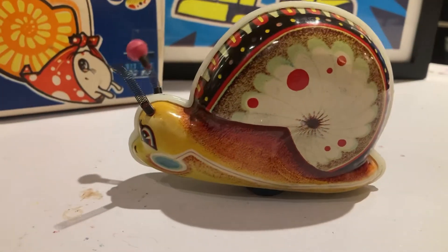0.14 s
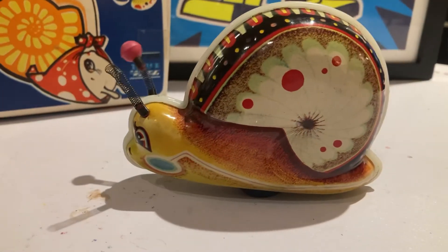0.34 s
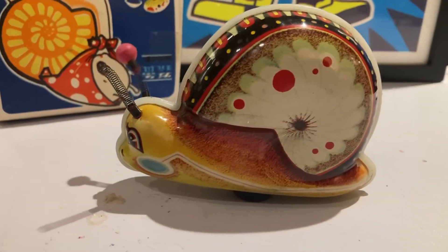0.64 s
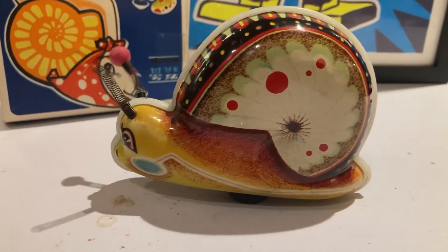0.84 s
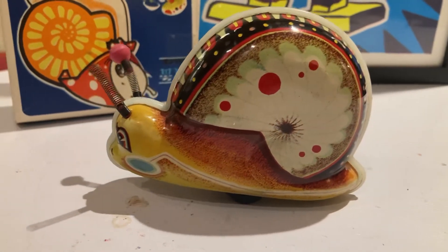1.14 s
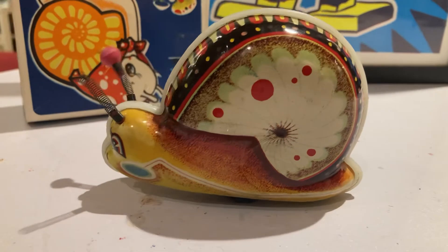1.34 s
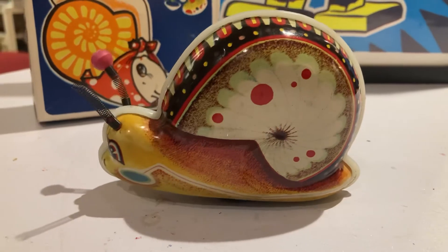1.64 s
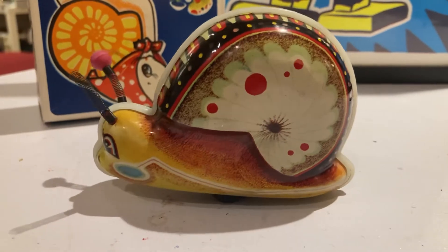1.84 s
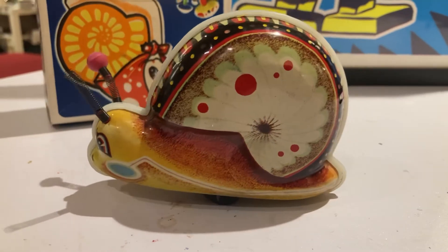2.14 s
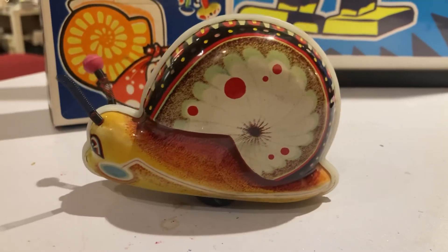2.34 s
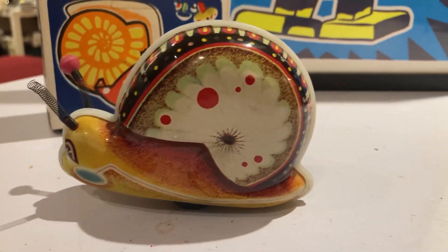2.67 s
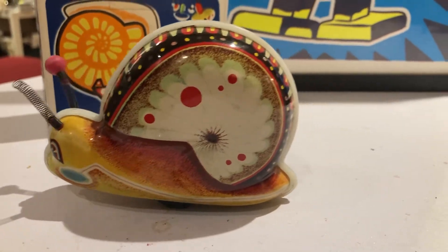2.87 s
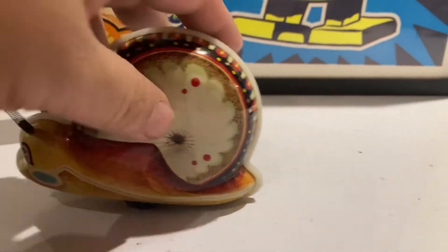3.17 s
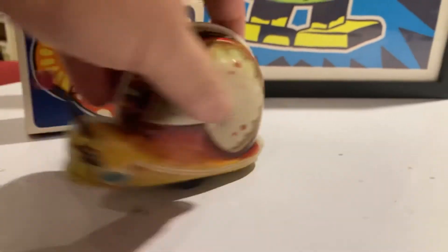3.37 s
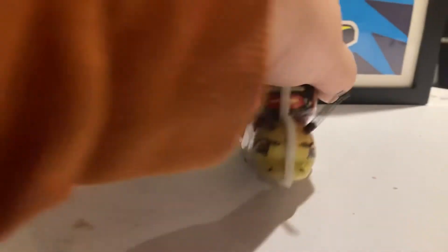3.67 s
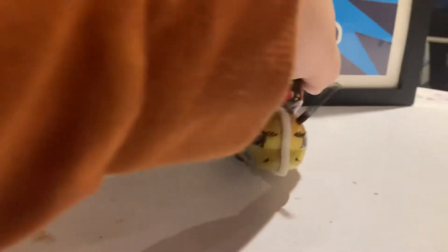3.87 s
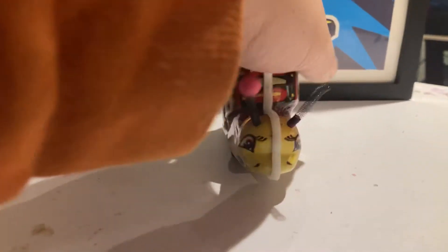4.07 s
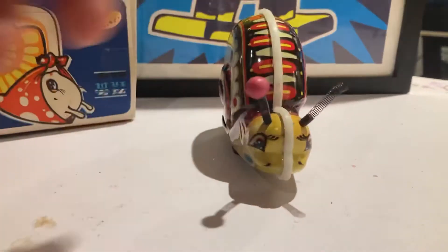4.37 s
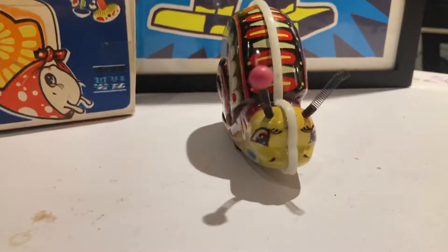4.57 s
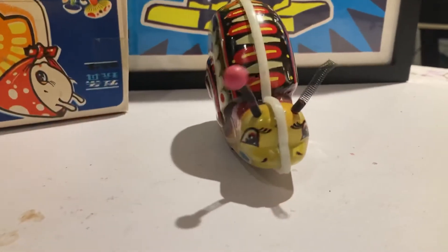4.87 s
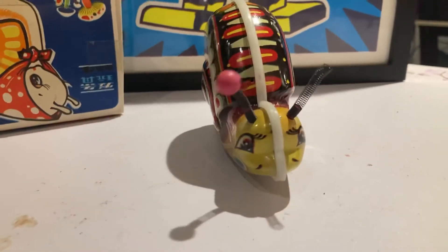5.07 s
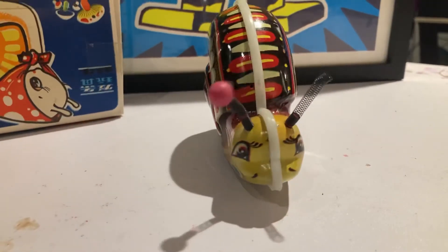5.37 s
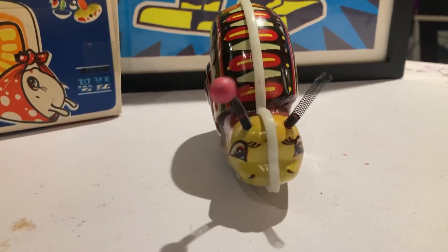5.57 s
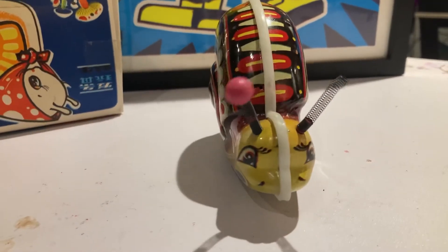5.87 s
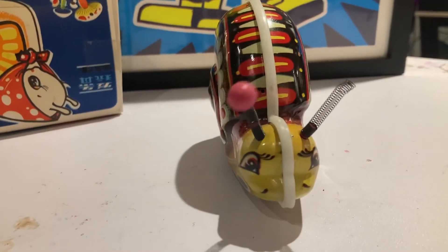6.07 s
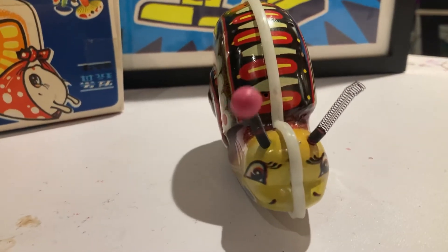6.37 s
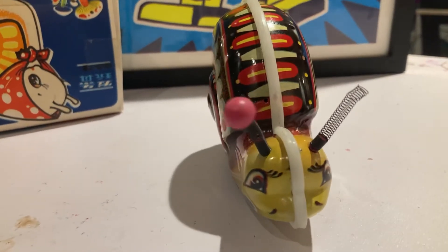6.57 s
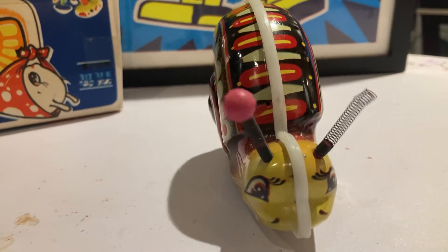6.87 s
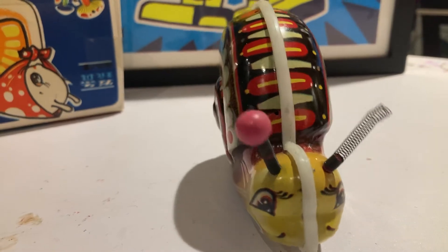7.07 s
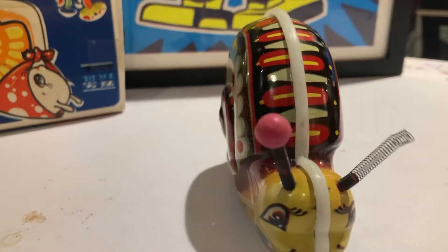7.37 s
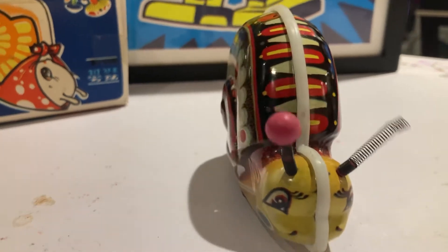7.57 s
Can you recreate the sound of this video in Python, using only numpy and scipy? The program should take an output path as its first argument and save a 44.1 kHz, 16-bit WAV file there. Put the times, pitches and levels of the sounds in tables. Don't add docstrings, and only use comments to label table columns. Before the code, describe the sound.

A tin clockwork toy is already running on a tabletop, very close to a phone's two microphones in a quiet room. From 0 to 1.5 s a bright, dry metallic whirr chatters quickly, fluttering around ninety-odd times a second, with a fainter hollow buzz through the table. Around 1.6-2.6 s it sags, slows and recovers twice, with tiny catches. At about 3.3 s fingers press the shell: a brief swell, then a duller, boomier, more nasal rattle while it is held and turned until 4.3 s. Released, it drops to a slower, coarser growl, with sharp lurches near 4.5, 4.9 and 5.2 s. It dips near 5.4 s, then speeds up from 5.7 s, closer and brighter, still uneven. After 7.1 s it slows sharply, stuttering through short gaps and almost stalling by 7.7 s. A faint low fridge hum and soft rumble continue throughout.

```python
import sys
import numpy as np
from scipy import signal
from scipy.fft import rfft, irfft, next_fast_len
from scipy.io import wavfile
from scipy.ndimage import uniform_filter1d

SR = 44100
rng = np.random.default_rng(int(sys.argv[2]) if len(sys.argv) > 2 else 0)


def field_ratio(decibels):
    return 10 ** (np.asarray(decibels, dtype=float) / 20)


def to_wav(s):
    ch = np.atleast_2d(s).T
    pcm = np.round(np.clip(ch, -1, 1) * 32767)
    wavfile.write(sys.argv[1], SR, pcm.astype(np.int16))


N = 340452
SIZE = next_fast_len(N + SR // 4)
HZ = np.arange(SIZE // 2 + 1) * SR / SIZE
GRID_HZ = np.linspace(1, SR / 2, 4096)
FULL_SPEED = 90

# f/Hz, width/Hz, then level/dB in each pose
BODY = [(173, 112, -2.5, -1, -2.5, 2, 2.5), (368, 71, -5.5, 1, 3, 5.5, 2),
        (461, 25.8, 1, -0.5, 10, 12, 9.5), (694, 51, 3, 6, 1.5, -0.5, 3),
        (878, 660, -1.5, 1.5, -3, -4, 0.5), (1066, 104, 9, 10.5, 7, 9, 11.5), (1189, 47, 8.5, 5, 9, 11, 4),
        (1430, 109, 1.5, 3.5, 2.5, 3.5, -1), (1528.5, 66, 2.5, 0.5, 0.5, -2.5, -14)]
# f/Hz, width/Hz, level/dB in the same five poses
SHELL = [(2020, 110, -11.5, -9, -11, -10.5, -14.5), (2324, 140, -5, -5.5, 5, -6, 1.5),
         (2500, 410, -11.5, -12, 2, -8.5, 0), (2974, 220, -0.5, 1, 2.5, -0.5, -0.5),
         (3407, 170, 3.5, 1.5, -2.5, 0.5, -2), (3850, 373, 0.5, 1.5, -3.5, -1, 1.5),
         (4302, 730, -1.5, 1.5, -4, -2.5, -2), (4805, 260, 2.5, 6, 2.5, 4, 2.5),
         (5315, 290, 4, 3, 2.5, 3.5, 2), (5884, 800, -1.5, -0.5, -4, -2, -3.5)]
# f/Hz, width/Hz, level/dB in the same five poses
HIGH_SHELL = [(6452, 240, 6.8, 4.5, 6.8, 5, 7), (6590, 990, 4.9, 2, 1.4, -0.5, 0.91),
              (7294, 660, 7, 6.3, 4, 1.5, 2.4), (8278, 400, 6.2, 4, 7, 8, 5),
              (8430, 230, 1.7, 0.61, 9.5, 10, 8.7), (8860, 380, 4, 2.7, 2, 3.5, 2.5),
              (9054, 220, 7.2, 6.7, 4, 5, 5.7), (9740, 500, 4, 4.5, 4.4, 7, 7.3), (10085, 620, 5, 6.2, 6, 7, 7),
              (10895, 330, 6.7, 7, 6, 1.5, 2.8),
              (11040, 174, 9, 11, 8, 8, 6), (11600, 590, 2.5, 2.5, 2, 2, 1), (12140, 350, 3, 3.5, 2, 3, 1.5),
          (12480, 200, 2.5, 0.5, 3.5, 0, -1.5), (13060, 200, 7, -6, 1, 4, -0.5),
          (13260, 390, 2.5, 3, 1, -1, -4), (14140, 210, 5, 3, 1, -1, -7), (14050, 510, 3.5, -3, 3, -4, 1.5),
          (14930, 310, 0, 0, -10, -7, -9), (16100, 880, -7, -5, 3.5, -7.5, 2)]
# f/Hz, right lags left/turns, likeness side-on/0-1, likeness facing/0-1, left
# minus right/dB
PORTS = [(0, 0, .8, .7, -1.5), (450, .08, .96, .94, 1), (1210, .12, .95, .96, 2), (2150, .3, .1, .2, 6.5),
         (2700, .2, .45, .75, .7), (3300, .48, .6, .85, 1), (3850, .52, .5, .92, .3),
         (4200, .72, .4, .5, -.3), (5500, .72, .3, .62, -3), (6400, 1, .35, .95, -.5),
         (6800, 1, .75, .99, 0), (7600, .82, .93, .98, 0), (8500, .62, .97, .97, 0),
                (15800, -1, .95, .95, 0)]


def snail():
    tin, body = effort()
    hz, turns, alike_side, alike_facing, pan_db = np.transpose(PORTS)
    lag = np.exp(-2j * np.pi * np.interp(HZ, hz, turns))
    pan = field_ratio(np.interp(HZ, hz, pan_db) / 2)

    squeeze_s, squeeze_length_s, squeeze_db = 3.29, 0.13, 3
    t = np.arange(N) / SR
    squeeze = field_ratio(squeeze_db * np.exp(-((t - squeeze_s) / squeeze_length_s) ** 2))
    low_tin = tin * squeeze * field_ratio(1.3 * walk(40))
    high_tin = tin * field_ratio(0.84 * walk(40))
    body = body * field_ratio(0.68 * walk(30))

    ticks = []
    for gain, per_s in ((low_tin, 7000), (high_tin, 7000), (body, 2500)):
        ticks.append(np.array([gain * unit(teeth(per_s, 2.1)) for _ in range(2)]))
    ticks.append(ticks[2] * rumble_gain())

    near, other = 0, 0
    for pose, weight in enumerate(poses()):
        parts = (SHELL, HIGH_SHELL, BODY[3:], BODY[:3])
        rings = np.array([resonances(part, pose) for part in parts])
        rings[2] *= -1
        rings[:2] *= thin_rings(0.55, 45)
        rings[2:] *= thin_rings(0.5, 24.4)
        power = np.mean(np.abs(rings) ** 2, axis=1)
        norms = [power[0] + power[1]] * 2 + [power[2] + power[3]] * 2
        alike = np.clip(np.interp(HZ, hz, alike_facing if pose >= 2 else alike_side), 0, 1)
        for pair, ring, norm in zip(ticks, rings, norms):
            response = np.interp(HZ, GRID_HZ, ring) / np.sqrt(norm)
            first, second = rfft(pair * weight, SIZE) * response
            near = near + first * np.array([pan, alike * lag / pan])
            other = other + second * np.sqrt(1 - alike ** 2) / pan
    right_only = np.array([[0], [1]])
    return irfft(near + other * right_only, SIZE)[:, :N]


# t/s, tin level/dB, body minus tin/dB
RUN = [(0, -24.5, -11), (.7, -25, -10), (1.35, -27, -10), (1.6, -31, -9.5), (2.1, -27, -11),
       (2.5, -26, -10), (3.1, -26, -11.5), (3.45, -30, -9), (3.65, -30.5, -11), (4.0, -26, -10.5),
       (4.26, -28.5, -9.5), (4.32, -31, -8.5), (4.85, -28, -9), (5.15, -25, -9), (5.4, -32, -8.5),
       (5.85, -26, -12), (6.6, -25.5, -10), (7.72, -28, -11.5)]
# t/s, length/ms, tin rise/dB, body rise/dB
SURGES = [(0.142, 43, 3, 3.5), (0.815, 26, 1, 2), (1.728, 12, 2.5, 7), (2.507, 9.3, 4, 5),
          (2.831, 9.9, 5.5, 1.5), (3.161, 43, 4, 3.6), (4.419, 8, 1.5, 2.8), (4.45, 7.2, 7, -7),
          (4.488, 25, 6, 9), (4.903, 7, 7, 6), (5.151, 11, 7, -2), (5.217, 11, 6, 10.5),
          (5.422, 11, 3.8, 5.1), (5.509, 48, 2, 5), (5.579, 8, 8, 2), (5.705, 42, 3, 4),
          (5.924, 9.4, 1.5, 5), (6.751, 18, 4.5, 5), (6.869, 12, 7, 1.0), (6.946, 51, 3.5, 2.5),
          (7.002, 8, 8, -3), (7.21, 190, 3, 0.7), (7.263, 10, 4.7, 8), (7.395, 12, 3.5, 6),
          (7.527, 6.2, 4, 0), (7.652, 12, 2, 8), (6.119, 8, 5, 1), (6.292, 18, 1.5, 3.5),
          (6.352, 28, 2.5, 1.5), (6.504, 14, 2, -1)]
# t/s, length/ms, tin change/dB, body change/dB
STALLS = [(0.743, 24, -3.5, -3.3), (0.845, 23, -2.5, -4), (1.126, 8.7, -3, 0), (1.576, 7, -6, -2),
          (1.612, 8, -2, 3), (1.874, 60, -1.5, -5.5), (2.323, 11, -10, -2), (2.424, 8, -2, -5),
          (3.021, 10, -8, -6), (3.045, 30, -2, -2.5), (3.375, 12, -7.5, -5), (3.759, 12, -5, -4),
          (3.931, 12, -8, -3.5), (4.316, 39, -3.5, -3.5), (4.521, 7, -9, -6), (4.558, 7.4, -6, 7.5),
          (4.635, 18, -6, -1), (5.249, 15, -2, 5), (5.408, 8.3, -3, 2), (5.47, 12, -2, -7),
          (6.133, 8.2, -10, 6.5), (6.563, 64, -2.5, -3.5), (6.66, 36, -4, -7), (7.132, 12, -10, -16),
          (7.436, 7.5, -9, -9), (7.57, 7, -6, -3), (7.598, 13, -17, -6), (7.63, 12.5, -19, -4),
          (7.665, 6.9, -12, -8), (7.695, 36, -18, 4)]
# t/s, teeth meshing/per s
SPEED = [(0, 96.73), (1.38, 95.42), (1.796, 68.68), (2.159, 94.64), (2.412, 63.49), (2.723, 97.31),
         (3.29, 93.57), (3.66, 89.61), (4.147, 83.51), (4.523, 54.22), (4.726, 58.74), (5.052, 62.04),
         (5.436, 60.21), (5.75, 88.0), (6.445, 80.93), (7.109, 95.16), (7.51, 43.5), (7.72, 23.5)]


def effort():
    t = np.arange(0, N, 32) / SR
    speed = np.interp(t, *np.transpose(SPEED))
    turns = np.cumsum(speed) * (t[1] - t[0])

    snap, snap_lag, slow_power = 0.33, 0.2, 1.86
    angle = 2 * np.pi * (turns + 0.759)
    tooth = np.cos(angle) + snap * np.cos(2 * angle + 2 * np.pi * snap_lag)
    mesh = tooth * (FULL_SPEED / speed) ** slow_power
    teeth_per_wobble = 14 / 3
    wobble = np.cos(2 * np.pi * (turns / teeth_per_wobble + 0.329))

    octaves = np.log2(speed / FULL_SPEED)
    s, near_db, low_db = np.transpose(RUN)
    tin = np.interp(t, s, near_db) + 8.5 * octaves + 1.36 * mesh + 1.28 * wobble
    body = np.interp(t, s, near_db + low_db) + 6.5 * octaves + 0.8 * mesh + 0.63 * wobble

    at, ms, tin_db, body_db = np.transpose(SURGES + STALLS)
    bells = np.exp(-((t[:, None] - at) / (ms / 2000)) ** 4)
    loose_db = 1.05 * walk(60)
    gains = []
    for db, step in ((tin, tin_db), (body, body_db)):
        level_db = np.interp(np.arange(N) / SR, t, db + bells @ step)
        gains.append(field_ratio(level_db + loose_db))
    return gains


def teeth(per_s, spread_db):
    touch = rng.random(N) < per_s / SR
    hardness = np.minimum(rng.exponential(size=N), 4.5)
    return touch * rng.standard_normal(N) * field_ratio(spread_db * hardness)


def rumble_gain():
    grip_s, grip_length_s, grip_db = 3.47, 0.19, 5
    t = np.arange(N) / SR
    octaves = np.log2(np.interp(t, *np.transpose(SPEED)) / FULL_SPEED)
    grip = grip_db * np.exp(-((t - grip_s) / grip_length_s) ** 2)
    return field_ratio(1.5 * octaves + grip)


def resonances(modes, pose):
    hz, width, db = np.transpose(modes)[[0, 1, 2 + pose], :, None]
    signs = (-1.) ** np.arange(len(modes))[:, None]
    detune = (GRID_HZ ** 2 - hz ** 2) / GRID_HZ / width
    return np.sum(signs * field_ratio(db) / (1 + 1j * detune), axis=0)


def thin_rings(share, width_hz, count=150):
    place_hz = rng.random(count)[:, None] * 15750
    size = rng.standard_normal(count)[:, None]
    return 1 + share * np.sum(size / (1 + 2j * (GRID_HZ - place_hz) / width_hz), axis=0)


# t/s, duration/s
POSE_CHANGES = [
    (1.596, 0.68),
    (3.42, 0.22),
    (4.338, 0.24),
    (5.603, 0.78),
]


def poses():
    t = np.arange(N) / SR
    begun = [np.ones(N)]
    for s, length in POSE_CHANGES:
        begun.append(np.clip((t - s) / length + 0.5, 0, 1))
    begun.append(np.zeros(N))
    return [np.sqrt(a - b) for a, b in zip(begun, begun[1:])]


# f/Hz, level/dB per Hz
ROOM = [(20, -35), (40, -4.5), (80, 6), (150, -4.5), (300, -12), (600, -9), (1200, -15.5), (2000, -20),
        (5000, -14), (15000, -71)]


def room():
    rumble_db, hum_hz, hum_db = -50.5, 121.1, -44.5
    hz, db = np.transpose(ROOM)
    spectrum = field_ratio(np.interp(np.log(HZ + 1), np.log(hz), db))
    mid, side = colour(rng.standard_normal((2, N)), spectrum)
    rumble = unit(mid + 0.23 * side * np.array([[1], [-1]]))
    rumble = rumble * field_ratio(rumble_db + 0.5 + 1.0 * walk(4.3))
    turns = np.cumsum(hum_hz + 0.936 * walk(3.6)) / SR
    hum = np.sin(2 * np.pi * turns) * field_ratio(hum_db + 0.41 * walk(3.2))
    return (rumble + hum) * field_ratio([[-.7], [.7]])


def unit(x):
    return x / np.sqrt(np.mean(x ** 2))


def colour(x, response):
    return irfft(rfft(x, SIZE) * response, SIZE)[..., :N]


def walk(rate):
    k = int(SR / rate)
    held = np.repeat(rng.standard_normal(N // k + 1), k)
    return 0.91 * uniform_filter1d(uniform_filter1d(held, k), k)[:N]


def scene():
    return snail() + room()


def band_limit(x):
    return signal.sosfilt(signal.butter(12, 17100, fs=SR, output="sos"), x)


def record(dry):
    return band_limit(dry)


dry = scene()
out = record(dry)
to_wav(out)
```